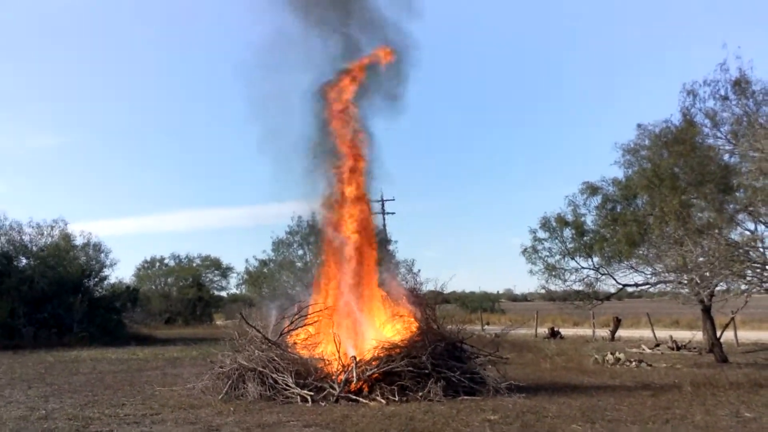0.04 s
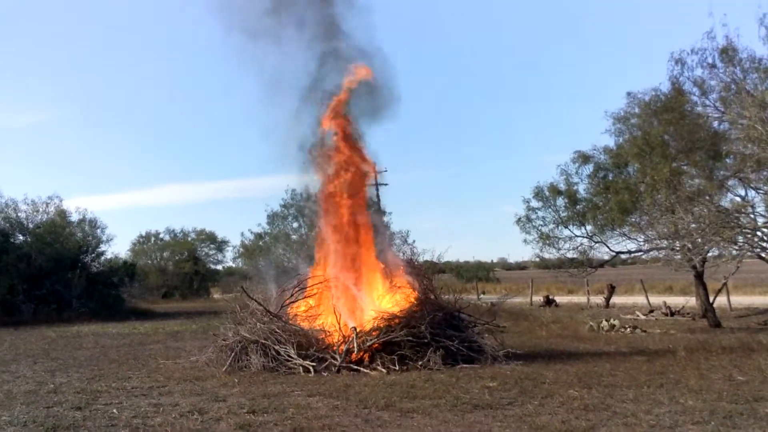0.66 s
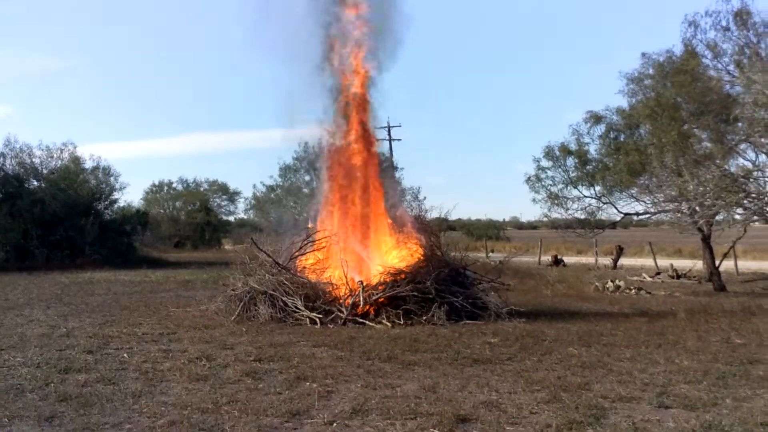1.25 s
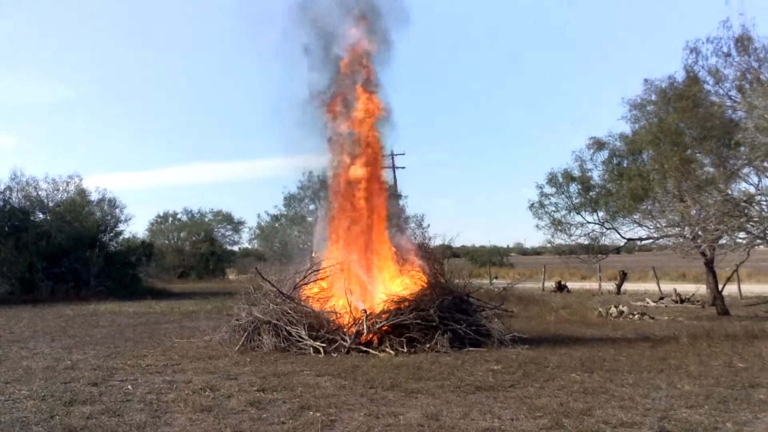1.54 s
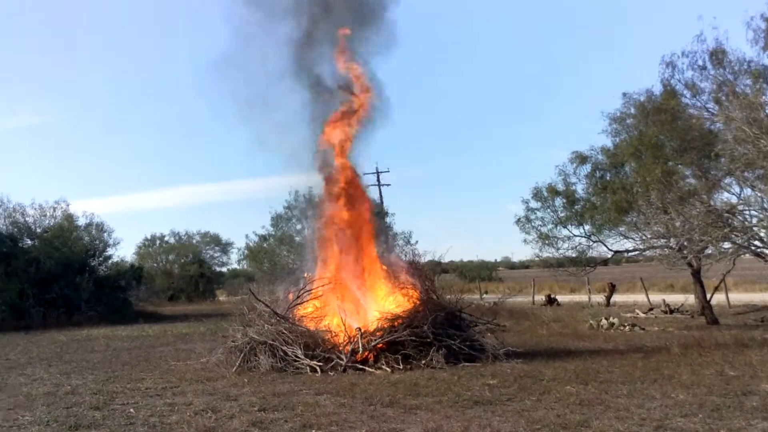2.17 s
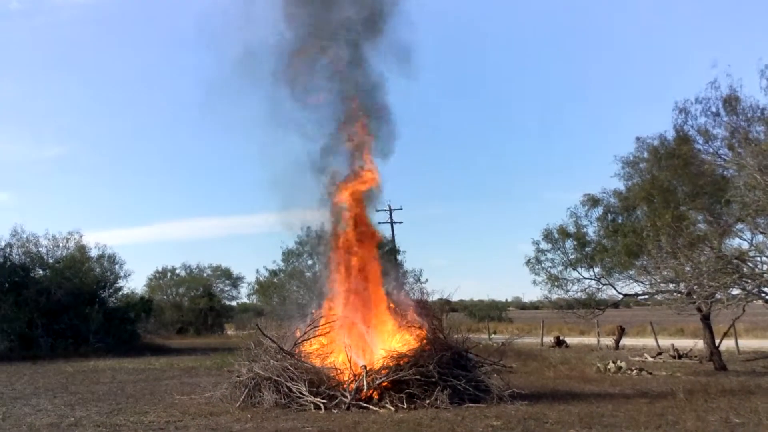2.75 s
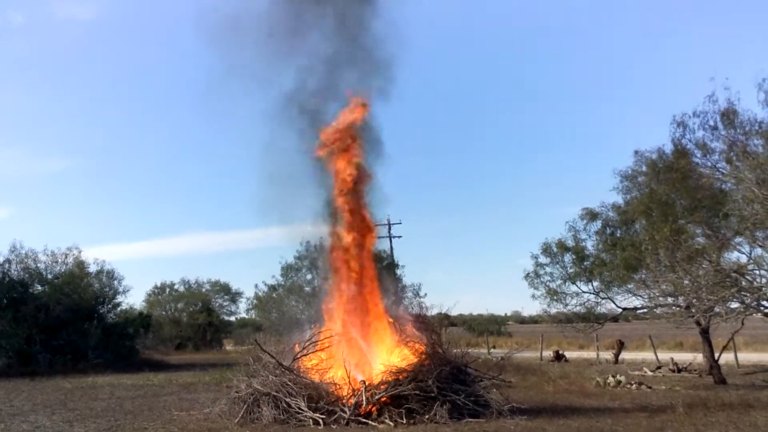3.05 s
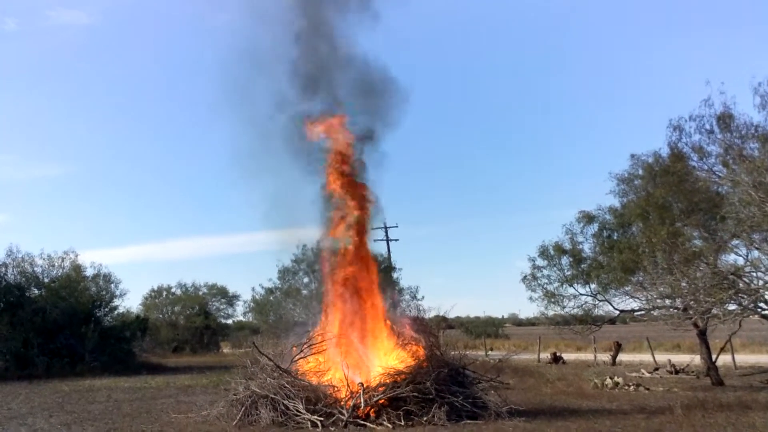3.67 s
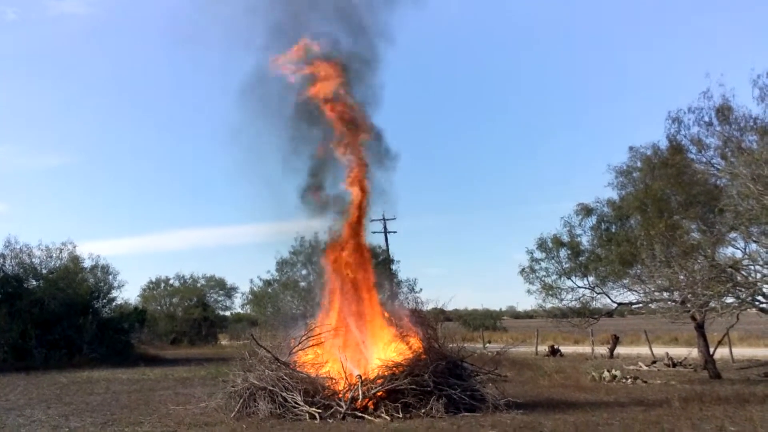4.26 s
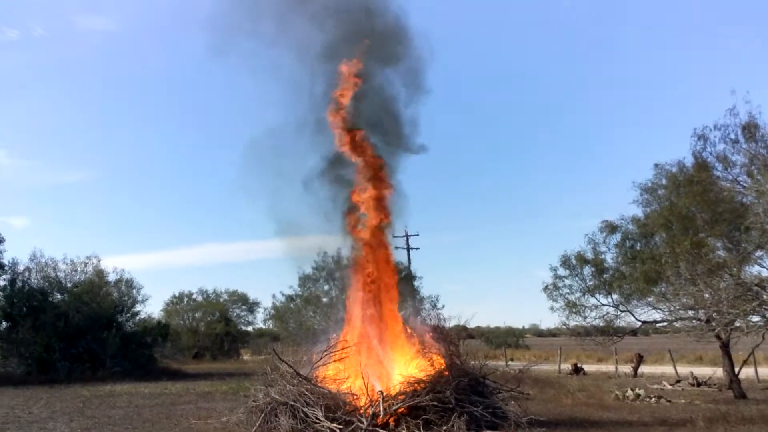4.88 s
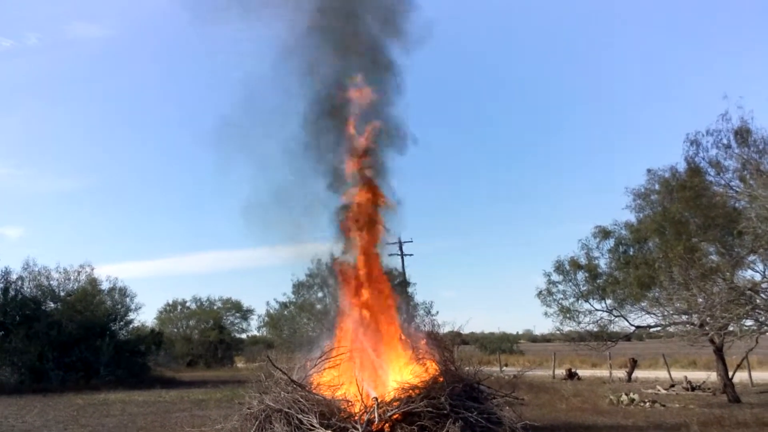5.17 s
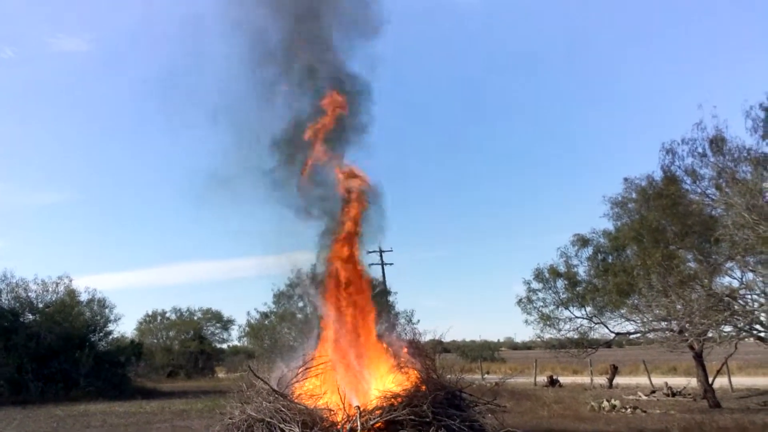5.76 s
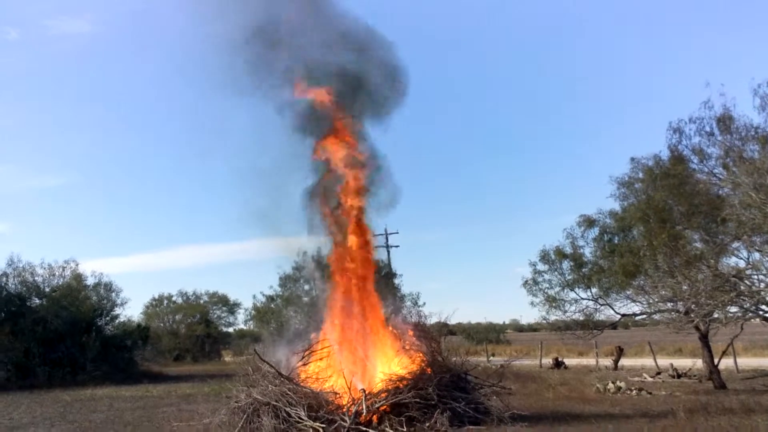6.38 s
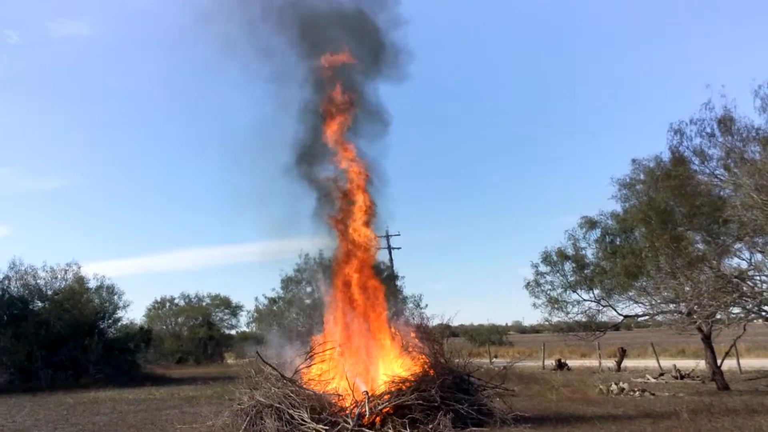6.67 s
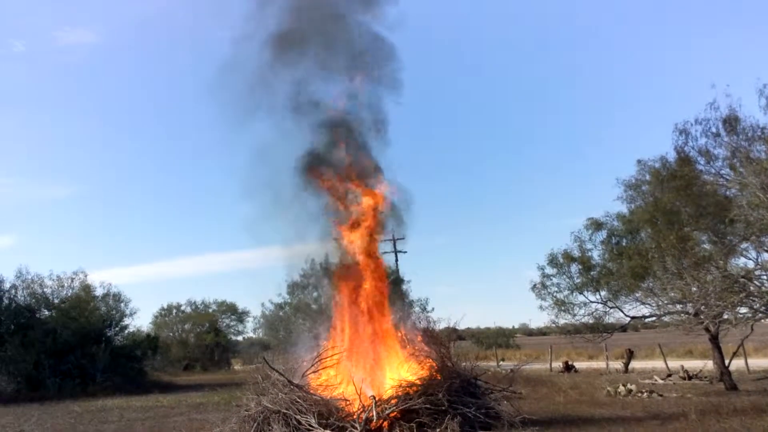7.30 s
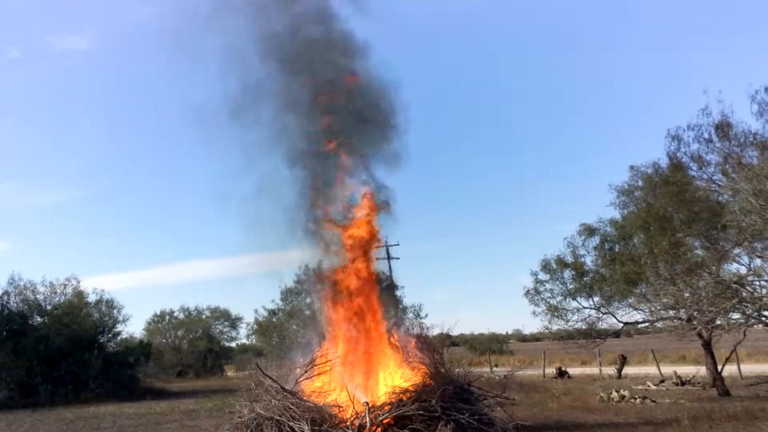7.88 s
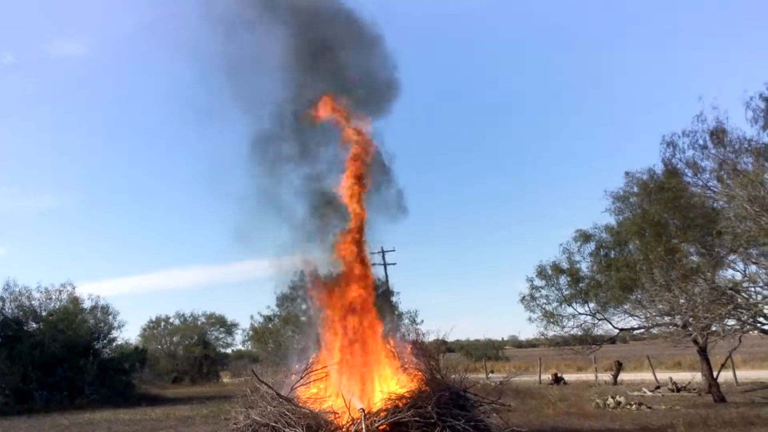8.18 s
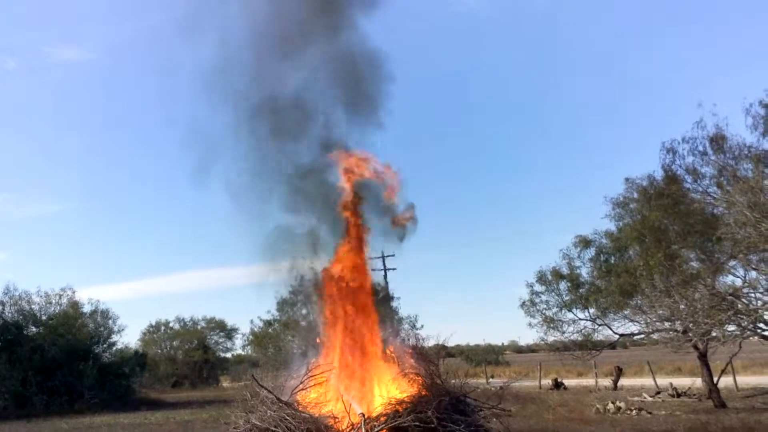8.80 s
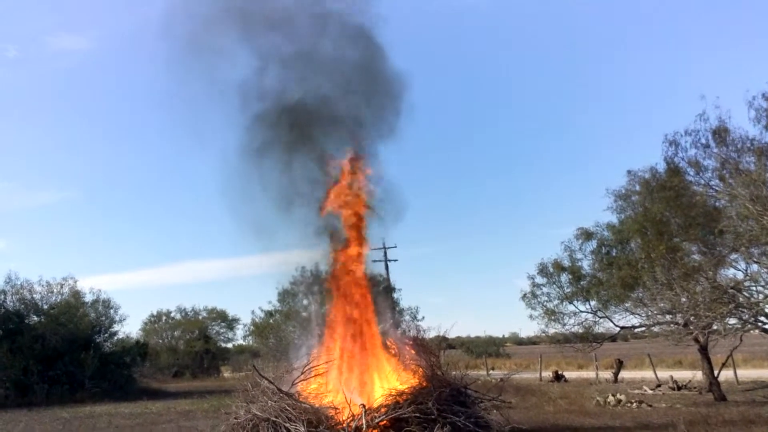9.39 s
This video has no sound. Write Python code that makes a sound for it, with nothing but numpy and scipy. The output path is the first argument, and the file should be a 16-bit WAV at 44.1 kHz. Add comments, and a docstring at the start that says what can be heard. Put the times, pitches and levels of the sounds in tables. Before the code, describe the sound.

A large pile of dry brush burns in an open field, several metres away. From the start to the end, at nearly 10 seconds, countless small twigs crackle over a bright, flickering hiss of steam and a lighter rustle. Sharp, dry pops stand out in front, many each second, unevenly spaced and often in clusters, with almost no echo. Especially hard ones come right at the start and around 1.3, 2.3, 6.1, 6.9, 8, 8.6 and 9.1 seconds, the hardest slightly overloading the microphone. The popping is a little busier from about 6 seconds on. Logs give faint, dull knocks near 0.4 and 2.7 seconds, and three more between 5.4 and 5.8 seconds. Underneath, the flames make a very soft roar and fluttering rush, with slight low swells around 5.8, 6.8 and 7.8 seconds. The fire stays steady in strength throughout.

```python
"""Brush pile burning

A tall pile of dry brush burns in an open field, several metres away. Steam hisses from the wood,
the pile rustles and the flame column rumbles softly. Over that bed countless twigs snap, sap pockets
burst in the sticks with sharp pops, and now and then a log gives a dull knock.
The hardest pops overload the microphone."""
import sys
import numpy as np
from scipy import signal
from scipy.fft import rfft, irfft, next_fast_len
from scipy.io import wavfile

SR = 44100
rng = np.random.default_rng(int(sys.argv[2]) if len(sys.argv) > 2 else 0)


def transcribe(u):
    """Save the signal u as a 16-bit wav file named by the first command-line argument.

    u: samples, shape (n,) or (channels, n), limited to [-1, 1]; the rate is SR.
    q: integer samples, one column per channel.
    """
    v = np.clip(np.atleast_2d(u).T, -1, 1)
    q = np.round(v * 32767).astype(np.int16)
    wavfile.write(sys.argv[1], SR, q)


N = 425124

# how hard the pile burns, before each layer's trim: time_s, sizzle_db, rustle_db
BLAZE_LEVELS = [(0.0, -33.5, -49.5), (0.67, -34.5, -52), (0.83, -34, -50.5), (1.61, -36, -53.5),
                (1.85, -33.5, -50), (4.59, -35, -51), (4.97, -33.5, -48.5), (5.31, -36, -53),
                (5.72, -32.5, -48.5), (5.98, -34, -51.5), (6.39, -33, -49), (6.82, -34, -53.5),
                (7.22, -33, -50), (7.79, -33.5, -51.5), (8.46, -33, -51), (8.81, -34.5, -50.5),
                (9.29, -33, -50), (9.64, -34, -51)]
# bright sizzle of thin twigs and steam: freq_hz, gain_db
SIZZLE_EQ = [(1500, -40), (3100, -8.5), (3800, -5), (4600, -4), (5600, 1), (6900, 5), (8000, 4),
             (9000, 4.5), (10200, 3), (12000, -11.5), (14000, -7)]
# midrange rustle inside the pile: freq_hz, gain_db
RUSTLE_EQ = [(400, -34), (650, -24.5), (850, -3.5), (1150, -0.5), (1450, -2.5), (2000, 4), (2650, 6.5),
             (3050, -5.5), (5000, -70)]
# the flame column billows up: centre_s, peak_db, length_s
FLAME_BILLOWS = [(3.6, -58, .12), (5.82, -52, .15), (6.44, -61, .3), (6.75, -55, .14), (7.78, -53, .13)]
# low end of the billows: freq_hz, gain_db
RUMBLE_EQ = [(12, 0), (25, -1), (62, 5), (100, -12.5), (200, -17), (500, -58)]
# soft roar of the flame column: freq_hz, gain_db
ROAR_EQ = [(30, -1), (100, 1.5), (170, 1.5), (310, 1.5), (420, -6.5), (560, -39), (1000, -31)]
# the roar eases very slightly: time_s, level_db
ROAR_FADER = [(0, -58), (9.64, -58.5)]
# gas rushing between the sticks: freq_hz, gain_db
RUSH_EQ = [(200, -12), (400, -5), (550, -4.5), (850, 4), (1100, -8), (1600, -19.5)]
# the rush comes in waves and dies down: time_s, level_db
RUSH_FADER = [(0, -54), (0.5, -59), (1.6, -58.5), (2.2, -55), (3.5, -68), (4.2, -59.5), (5.2, -65.5),
              (6.2, -57.5), (7.0, -70), (7.9, -73), (8.7, -59), (9.64, -80)]
# base tone of every snap and pop: freq_hz, gain_db
SNAP_EQ = [(120, -29), (550, -29.5), (850, -19.5), (1200, -15.5), (1600, -14.5), (2150, -11), (2700, -5.5),
           (3100, -14), (4200, -6), (4600, -6), (5500, -1.5), (7000, 5), (9000, 3.5), (10200, 1),
           (13000, -16.5), (16000, 0)]
# foreground pops, level as rms if packed into 5 ms: start_s, level_db, pitch_hz, body_db, t60_s
SAP_POPS = [(0.0339, -19, 6550, 6, 0.0072), (0.0679, -10.5, 6100, 7, 0.059),
            (0.2131, -20.5, 5400, -5, 0.024), (0.254, -21.5, 5000, -3, 0.04),
            (0.2872, -17.5, 2300, -28, 0.016), (0.3091, -29, 6000, -5, 0.008),
            (0.3371, -28, 9000, -7, 0.012), (0.3684, -17.5, 10500, -22, 0.025),
            (0.3805, -28.5, 3900, 25, 0.037), (0.4704, -20, 10400, 6, 0.0047),
            (0.516, -19.5, 3900, -10, 0.045), (0.6385, -25.5, 1600, 12.5, 0.008),
            (0.6699, -25, 9100, 8, 0.014), (0.7467, -28, 4000, 15, 0.013), (0.7658, -16, 9900, 5.5, 0.002),
            (0.948, -29, 9500, 11, 0.004), (0.8693, -19, 6850, 12, 0.042), (0.9922, -26, 7000, -5, 0.013),
            (0.9973, -17.5, 4550, 12.5, 0.026), (1.0346, -29.5, 2190, 17, 0.006),
            (1.0642, -18, 4330, 1, 0.011), (1.0801, -20, 2500, -11, 0.005),
            (1.2035, -23, 10400, -12, 0.017), (1.2164, -25, 9600, -4, 0.0045),
            (1.2406, -24.5, 10400, -12, 0.004), (1.2579, -22, 4430, -1, 0.054),
            (1.2838, -12, 10400, 4.5, 0.022), (1.3178, -19, 5170, 8, 0.11), (1.347, -20.5, 2700, 4, 0.054),
            (1.4195, -16, 2700, -9.0, 0.072), (1.5426, -19.5, 8800, 5, 0.0073),
            (1.6483, -22, 6900, 12, 0.046), (1.6745, -19, 8000, 18, 0.024), (1.7003, -36, 1400, 22, 0.005),
            (1.7117, -16.5, 2470, 7, 0.017), (1.8419, -23.5, 9000, 10, 0.008),
            (1.7725, -18, 5460, 17, 0.02), (1.863, -18, 5400, 3, 0.021), (1.8841, -26.5, 5700, 19, 0.019),
            (1.9405, -26.5, 9100, 14, 0.0048), (1.9667, -27.5, 2380, 6, 0.008),
            (2.1577, -13.5, 6600, 11.5, 0.015), (2.1868, -26, 5900, -4, 0.033),
            (2.1982, -23.5, 10400, -6, 0.009), (2.2613, -19, 2400, 9, 0.004),
            (2.2628, -8.5, 7800, 17.5, 0.018), (2.294, -25.5, 2400, 16, 0.01),
            (2.4739, -39, 2000, 26, 0.004), (2.4906, -24, 9600, -6, 0.005), (2.3595, -20, 5000, 4, 0.11),
            (2.7115, -19, 2300, 3, 0.01), (2.7731, -29.5, 2000, 12, 0.008),
            (2.8314, -24.5, 7540, -6, 0.014), (2.9088, -26.5, 5900, 9, 0.0061),
            (2.9651, -24, 2600, 0, 0.014), (2.9857, -24, 8500, 5, 0.005),
            (2.9895, -14.5, 2800, 17.5, 0.0078), (2.999, -23, 7500, -4, 0.008),
            (3.0042, -27, 9000, -3, 0.008), (3.0465, -33, 1600, 18, 0.005), (3.1184, -14.5, 7800, 8, 0.002),
            (3.2676, -20, 10400, 6, 0.024), (3.3376, -22, 2500, -4, 0.049),
            (3.5254, -27.5, 8700, 0, 0.0046), (3.5902, -18, 3000, -2, 0.0079),
            (3.6788, -15, 2600, -19, 0.016), (3.6917, -24, 2300, 5, 0.067), (3.7122, -15, 2230, 8, 0.073),
            (3.7868, -23, 6400, 18, 0.025), (3.8246, -21.5, 10400, 15.5, 0.0067),
            (3.8935, -26, 6500, 19, 0.024), (3.9695, -23, 10400, 14, 0.016), (3.9762, -20, 5200, 6, 0.0065),
            (4.0097, -14.5, 6200, 13, 0.012), (4.0441, -29, 2400, 14, 0.008),
            (4.0757, -19.5, 2510, 2, 0.017), (4.1756, -22.5, 7400, 9, 0.015), (4.2217, -20, 5700, 21, 0.01),
            (4.2414, -23.5, 7300, 18, 0.012), (4.2804, -20, 2500, 3, 0.045),
            (4.2903, -18.5, 8300, -7, 0.005), (4.3813, -25.5, 6900, -3, 0.013),
            (4.4077, -25, 6800, -8, 0.014), (4.4973, -19, 5000, 15, 0.077),
            (4.7048, -23.5, 7700, 17, 0.061), (4.8261, -22.5, 7200, 6, 0.035),
            (4.8512, -32, 7500, -3, 0.003), (4.8746, -25, 8400, 12.0, 0.021),
            (4.936, -20.5, 9900, -12, 0.013), (4.9838, -17.5, 7400, 5, 0.039),
            (5.0274, -27.5, 7500, 5, 0.012), (5.0645, -22, 8400, 6, 0.004), (5.0902, -22.5, 2700, 2, 0.007),
            (5.1157, -18, 2300, 1, 0.081), (5.1312, -20, 2300, 6.5, 0.018), (5.1423, -22, 2300, 7, 0.073),
            (5.1682, -31.5, 6000, 21, 0.005), (5.3052, -17, 2500, -10, 0.073),
            (5.3324, -21, 7740, -13, 0.004), (5.4993, -23, 10500, 13, 0.0045),
            (5.5261, -25.5, 4200, 11, 0.045), (5.6917, -12, 8450, 3, 0.0043),
            (5.708, -16.5, 7360, 11.5, 0.0089), (5.7281, -19.5, 3380, 6, 0.041),
            (5.7763, -19, 6500, 15, 0.015), (5.8026, -24, 8800, 12, 0.011), (5.8427, -22, 2400, -11, 0.002),
            (6.0701, -19, 3800, 14.5, 0.012), (6.1345, -10, 8700, 8, 0.0023),
            (6.1819, -14.5, 7300, 4, 0.026), (6.2249, -13.5, 7300, 4, 0.013), (6.236, -17, 6360, 20, 0.02),
            (6.247, -26, 8800, -6, 0.003), (6.2746, -16.5, 4220, -4, 0.028), (6.2958, -26, 3900, 18, 0.016),
            (6.3219, -12.5, 6500, 10, 0.012), (6.3863, -21, 3900, 3, 0.046), (6.4179, -27, 4500, 1, 0.007),
            (6.4558, -36, 6500, 8, 0.012), (6.4795, -15.5, 3000, -6, 0.04), (6.5188, -25, 3500, 6, 0.05),
            (6.5377, -18, 6300, 9, 0.068), (6.6311, -22, 10400, 11, 0.042), (6.6445, -26, 6800, 24, 0.011),
            (6.6633, -28.5, 1500, 13, 0.005), (6.6927, -26, 8900, 13, 0.005),
            (6.7055, -17.5, 5000, 13.5, 0.016), (6.7595, -32, 8000, 0, 0.004),
            (6.7673, -26, 2300, -9, 0.012), (6.7765, -27, 8000, 0, 0.006), (6.794, -30, 7500, 0, 0.006),
            (6.9309, -9.5, 7860, -0.5, 0.0098), (6.9592, -24.5, 8000, 20, 0.012),
            (6.9648, -32, 2200, 14, 0.003), (7.02, -25, 5700, -1, 0.012), (7.0331, -25, 10400, 4, 0.045),
            (7.0966, -21.5, 2300, -1, 0.051), (7.1152, -22.5, 8400, 11, 0.012),
            (7.1297, -21.5, 10400, -2, 0.0055), (7.2215, -23, 5900, -1, 0.084),
            (7.2406, -22, 4000, 5, 0.017), (7.2524, -21.5, 4800, 16, 0.017), (7.2706, -19, 4200, 11, 0.034),
            (7.2836, -16.5, 3370, -1, 0.01), (7.2951, -24, 8500, 5, 0.018), (7.3505, -34, 3500, 5, 0.006),
            (7.4013, -27.5, 3700, 16.5, 0.02), (7.4188, -17, 4430, 4, 0.004),
            (7.4328, -17.5, 3200, 3, 0.066), (7.4611, -19.5, 6850, 2, 0.038),
            (7.4755, -18, 2300, -2, 0.012), (7.494, -25, 9000, -7, 0.01), (7.5171, -25.5, 5900, -10, 0.014),
            (7.6263, -26, 8000, 4, 0.047), (7.6418, -24, 8500, 1, 0.018), (7.6818, -20, 3200, -11, 0.024),
            (7.7353, -23, 2300, -1, 0.045), (7.7461, -16.5, 7960, 6.5, 0.036),
            (7.7832, -19, 7700, 11, 0.12), (7.8061, -14, 2200, 4.5, 0.028),
            (7.8512, -15.5, 2300, -16, 0.029), (7.9741, -11.5, 7150, 8.5, 0.031),
            (7.9838, -19.5, 7700, 10, 0.012), (7.9905, -23, 7800, -7, 0.005), (8.062, -23, 8700, 10, 0.01),
            (8.0749, -17.5, 2700, 1.5, 0.17), (8.1468, -23.5, 9400, -14, 0.022),
            (8.227, -12.5, 6300, 3, 0.011), (8.2476, -13.5, 4000, 2, 0.018), (8.2613, -19.5, 3000, 2, 0.04),
            (8.2734, -23, 9100, -2, 0.002), (8.3135, -22, 7400, 5, 0.04), (8.3267, -22, 6500, 16, 0.047),
            (8.3661, -27, 7100, 18, 0.012), (8.4199, -20, 8350, 7, 0.017),
            (8.4427, -15.5, 8450, 12.5, 0.012), (8.4693, -11.5, 3500, -2, 0.025),
            (8.5117, -19.5, 6500, -1, 0.021), (8.5347, -18.5, 9500, 0, 0.0087),
            (8.5543, -7, 8560, 12, 0.012), (8.6261, -20.5, 5940, 0, 0.036), (8.666, -20, 6860, 9, 0.074),
            (8.6894, -9.5, 9600, 2.5, 0.0035), (8.8238, -26, 10400, 12.5, 0.015),
            (8.8626, -25.5, 8500, 9, 0.0087), (8.9787, -23.0, 5400, 21, 0.02),
            (8.9914, -21.5, 10300, -13, 0.012), (9.0476, -16.5, 10300, 10.5, 0.0076),
            (9.1066, -9.0, 7200, 8, 0.014), (9.1264, -20, 3500, -14, 0.007),
            (9.1785, -25.5, 6200, 12, 0.045), (9.1984, -13.5, 7700, 11, 0.022),
            (9.2918, -26, 7500, 8, 0.007), (9.3151, -22, 3470, 15, 0.053), (9.4051, -25, 8760, 10, 0.009),
            (9.4134, -27.5, 5060, 26, 0.029), (9.4513, -16.5, 2330, -2, 0.14),
            (9.4875, -15.5, 3000, 1.5, 0.07), (9.5439, -26.5, 9600, 1, 0.018)]
# dull knocks from logs deep in the pile: start_s, peak_db, pitch_hz
LOG_KNOCKS = [(0.416, -31, 1030), (2.687, -33.5, 980), (5.454, -37.5, 765), (5.628, -35, 515),
              (5.833, -33, 1080)]
# steep treble cut above 10 kHz, with a narrow band left near 12 kHz: freq_hz, gain_db
TOP_CUT_EQ = [(9800, 1), (10400, -2.5), (11000, -41.5), (11900, -3), (12900, -67), (16000, -73)]

SPUTTER_HZ = 32   # pace of the flicker in sizzle and rustle
RUMBLE_FLOOR_DB = -69.5   # between the billows
# repeats of a crack: (shortest, longest) delay, level against the first step
SECOND_SPLIT_S, SECOND_SPLIT_DB = (.0002, .0014), -4   # the crack runs on
ECHO_S, ECHO_DB = (.0076, .0093), -16   # slap off the surroundings


def from_db(db):
    """Decibels to gain."""
    return 10 ** (np.asarray(db) / 20)


def unit_rms(x):
    """Scale to rms 1."""
    return x / np.sqrt(np.mean(x ** 2) + 1e-20)


def automation(rows):
    """Draw one curve per level column, with a value at every sample."""
    time_s, *columns = np.transpose(rows)
    return [np.interp(np.arange(N) / SR, time_s, column) for column in columns]


def eq_db(eq, hz):
    """Read an EQ curve on a log-frequency axis."""
    freq_hz, gain_db = np.transpose(eq)
    return np.interp(np.log(hz + 1), np.log(freq_hz), gain_db)


def drift(rate_hz):
    """Smooth random modulation, rms about 1."""
    hop, warm_up = 40, 2000
    pole = np.exp(-2 * np.pi * rate_hz * hop / SR)
    noise = rng.standard_normal(N // hop + warm_up + 2)
    slow = signal.lfilter([1], [1, -2 * pole, pole * pole], noise)[warm_up:]
    return np.interp(np.arange(N) / hop, np.arange(len(slow)), unit_rms(slow))


def equalise(x, db_at):
    """Minimum-phase EQ with gain db_at(hz): no pre-ring to soften the attacks."""
    size = 2 * next_fast_len(x.shape[-1] // 2 + 1)
    hz = np.arange(size // 2 + 1) * SR / size
    cepstrum = irfft(np.log(from_db(db_at(hz))), size)
    cepstrum[..., 1:size // 2] *= 2
    cepstrum[..., size // 2 + 1:] = 0
    return irfft(rfft(x, size) * np.exp(rfft(cepstrum)), size)[..., :x.shape[-1]]


def coloured(x, eq):
    """Run a sound through an EQ curve and bring it to rms 1."""
    return unit_rms(equalise(x, lambda hz: eq_db(eq, hz)))


def sizzle(level_db, eq, ticks_per_s, spread_db, steam_db, flicker_db):
    """Flurries of tiny, uneven ticks over a smooth jet of steam, flickering together."""
    fires = rng.random(N) < ticks_per_s * from_db(2 * drift(SPUTTER_HZ)) / SR
    sizes = from_db(spread_db * np.minimum(rng.exponential(1, N), 4))
    ticks = unit_rms(fires * sizes * rng.choice([-1, 1], N))
    steam = from_db(steam_db) * rng.standard_normal(N)
    return from_db(level_db + flicker_db * drift(SPUTTER_HZ)) * coloured(ticks + steam, eq)


def flame(roar_flutter_db, rush_flutter_db, puffing_db):
    """Turbulent gas: low billows, a soft roar and a fast-fluttering rush between the sticks."""
    t = np.arange(N) / SR
    rush_db, = automation(RUSH_FADER)
    roar_db, = automation(ROAR_FADER)
    puffing = from_db(-puffing_db * np.maximum(drift(6.0), 0))   # ducks all but the swells
    swells = sum(from_db(peak_db) * np.exp(-(2 * (t - centre_s) / length_s) ** 2)
                 for centre_s, peak_db, length_s in FLAME_BILLOWS)
    rumble_gain = np.hypot(from_db(RUMBLE_FLOOR_DB) * puffing, swells)
    rumble = rumble_gain * coloured(rng.standard_normal(N), RUMBLE_EQ)
    roar = from_db(roar_db + roar_flutter_db * drift(7.6)) * coloured(rng.standard_normal(N), ROAR_EQ)
    flutter = np.minimum(drift(18.0), .6)   # the rush flutters, with brief dips deeper than its peaks
    rush = from_db(rush_db + rush_flutter_db * flutter) * coloured(rng.standard_normal(N), RUSH_EQ)
    return rumble + puffing * (roar + rush)


def splitting_wood(rows, ring_db, ring_octaves, scatter_db, scatter_t60_s,
                   crack_db, fibre_db, thinness, size):
    """A two-step crack, a dying spray of tearing fibres, then echo and scatter off branches and ground."""
    start_s, level_db, pitch_hz, body_db, t60_s = np.array(rows, float).T[:, :, None]
    count = len(rows)
    t = np.arange(size) / SR
    noise, grit = rng.standard_normal((count, 2, size)).transpose(1, 0, 2)
    fibres = from_db(fibre_db * np.repeat(grit, 16, axis=1)[:, :size])
    tearing = fibres * from_db(-60 * t / np.maximum(t60_s, .002))
    scatter = from_db(scatter_db - 60 * t / scatter_t60_s)
    # thin out the spray's low end, then add the cracks as full-range clicks
    hits = signal.lfilter([1, -thinness], [1], (tearing + scatter) * noise)
    hits[:, 0] += from_db(crack_db)
    repeats = [(SECOND_SPLIT_S, SECOND_SPLIT_DB), (ECHO_S, ECHO_DB)]
    for (range_s, repeat_db), chance in zip(repeats, rng.random((count, 2)).T):
        delay = (np.interp(chance, [0, 1], range_s) * SR).astype(int)
        hits[np.arange(count), delay] += from_db(crack_db + repeat_db)

    def stick_tone_db(hz):
        ring = ring_db * np.exp(-.5 * (np.log2((hz + 1) / pitch_hz) / ring_octaves) ** 2)
        body = body_db / (1 + (hz / 3800) ** 4)   # thick sticks carry more low mids
        return eq_db(SNAP_EQ, hz) + ring + body

    hits = equalise(hits, stick_tone_db)
    energy = np.sum(hits ** 2, axis=1, keepdims=True)
    hits *= from_db(level_db) * np.sqrt(.005 * SR / energy)   # as much energy as 5 ms at level_db
    out = np.zeros(N + size)
    for start, hit in zip(np.clip(start_s[:, 0] * SR, 0, N - 1).astype(int), hits):
        out[start:start + size] += hit
    return out[:N]


def twig_crackle(blaze_db, count, spread_db, body_db, body_spread_db, t60_s):
    """Small twigs snap at random, each with its own strength, pitch, thickness and decay."""
    when, tone = rng.random((2, count))
    strength, thickness, length = np.clip(rng.standard_normal((3, count)), -2, 2)
    level_db = blaze_db[(when * (N - 1)).astype(int)] + spread_db * strength
    pitch_hz = 3300 * 3 ** tone
    bodies_db = body_db + body_spread_db * thickness
    decays_s = t60_s * 2 ** (1.05 * length)
    snaps = np.column_stack([when * N / SR, level_db, pitch_hz, bodies_db, decays_s])
    return splitting_wood(snaps, ring_db=7.0, ring_octaves=.15, scatter_db=-18, scatter_t60_s=.04,
                          crack_db=15, fibre_db=3.0, thinness=.4, size=1024)


def sap_pops():
    """Sap pockets burst the sticks open: hard attacks, with tails that die fast in the open field."""
    return splitting_wood(SAP_POPS, ring_db=8.0, ring_octaves=.28, scatter_db=-17, scatter_t60_s=.06,
                          crack_db=13, fibre_db=4.5, thinness=.56, size=2048)


def log_knocks(ring_cycles, thud_db, thud_t60_s, size=2048):
    """A muffled burst inside a log sets it ringing for a few cycles."""
    out, t = np.zeros(N + size), np.arange(size) / SR
    for start_s, peak_db, pitch_hz in LOG_KNOCKS:
        ring = np.sin(2 * np.pi * pitch_hz * t) * from_db(-60 * t * pitch_hz / ring_cycles)
        thud = from_db(thud_db - 60 * t / thud_t60_s) * rng.standard_normal(size)
        thud[0] = 1   # the attack
        knock = signal.fftconvolve(thud, ring)[:size]
        start = int(start_s * SR)
        out[start:start + size] += from_db(peak_db) * knock / np.abs(knock).max()
    return out[:N]


def scene():
    """The mono mix: pops up front, crackle and sizzle behind, logs and flame underneath."""
    sizzle_db, rustle_db = automation(BLAZE_LEVELS)
    pops = sap_pops()
    twigs = twig_crackle(sizzle_db - 1.67, count=900, spread_db=3.0,
                         body_db=1.5, body_spread_db=6.0, t60_s=.008)
    hiss = sizzle(sizzle_db - 3, SIZZLE_EQ, ticks_per_s=700, spread_db=2, steam_db=2.5, flicker_db=2.7)
    rustle = sizzle(rustle_db - .4, RUSTLE_EQ, ticks_per_s=700, spread_db=-2, steam_db=1.5, flicker_db=3)
    logs = log_knocks(ring_cycles=10, thud_db=-18, thud_t60_s=.0081)
    flames = flame(roar_flutter_db=2.5, rush_flutter_db=5.0, puffing_db=2.5)
    return (pops + twigs + hiss + rustle + logs + flames)[None]


def record(dry):
    """The top is dulled and the hardest pops are soft-clipped; a steep high cut follows."""
    ceiling, cutoff_hz = .8, 17000
    dulled = equalise(dry, lambda hz: eq_db(TOP_CUT_EQ, hz))
    clipped = dulled / (1 + (dulled / ceiling) ** 12) ** (1 / 12)
    return signal.sosfilt(signal.cheby2(14, 70, cutoff_hz, fs=SR, output="sos"), clipped)


dry = scene()
out = record(dry)
transcribe(out)
```